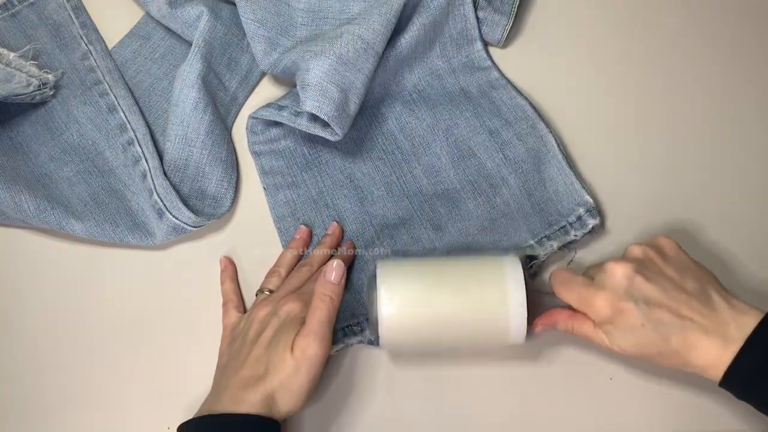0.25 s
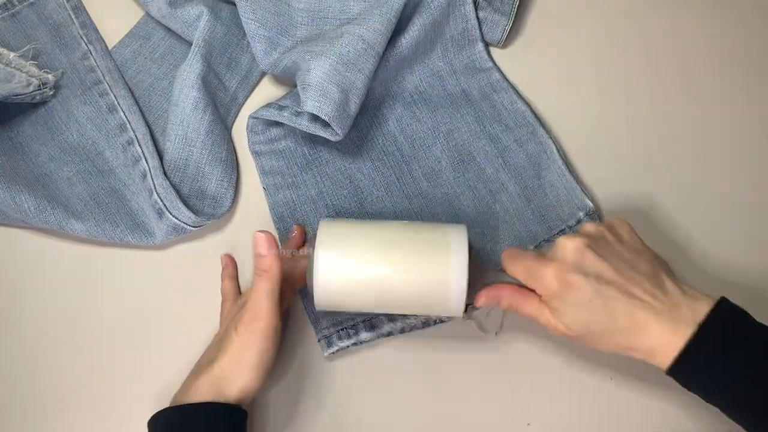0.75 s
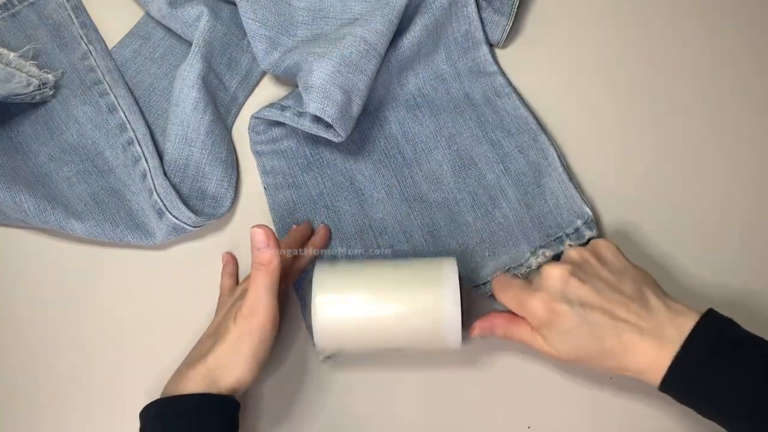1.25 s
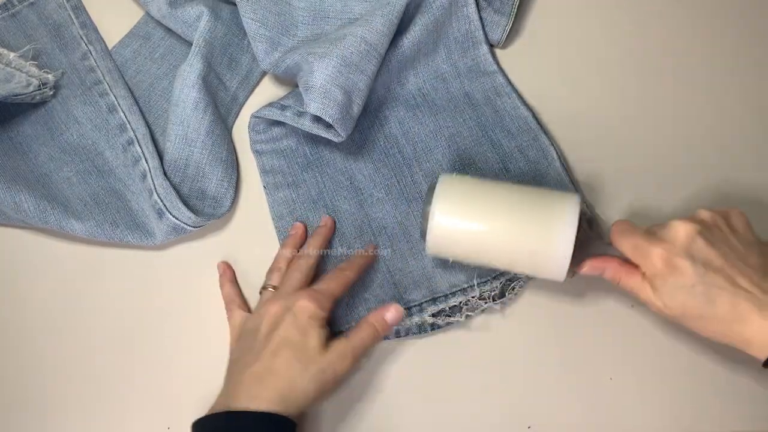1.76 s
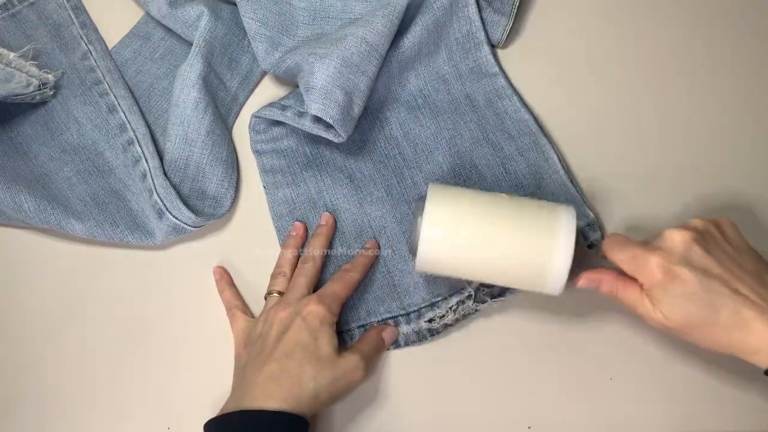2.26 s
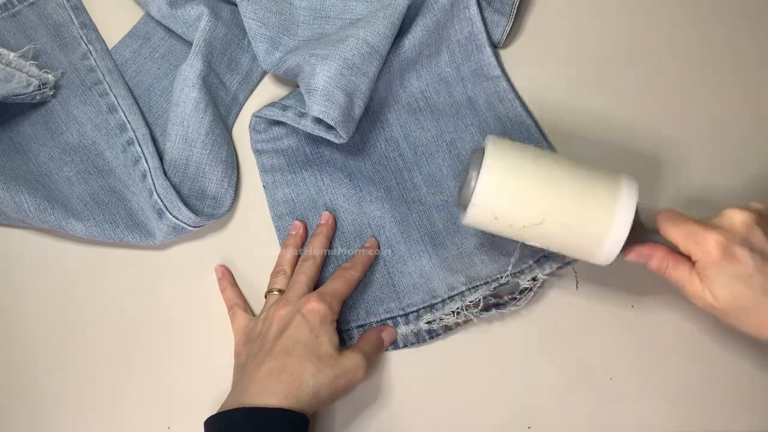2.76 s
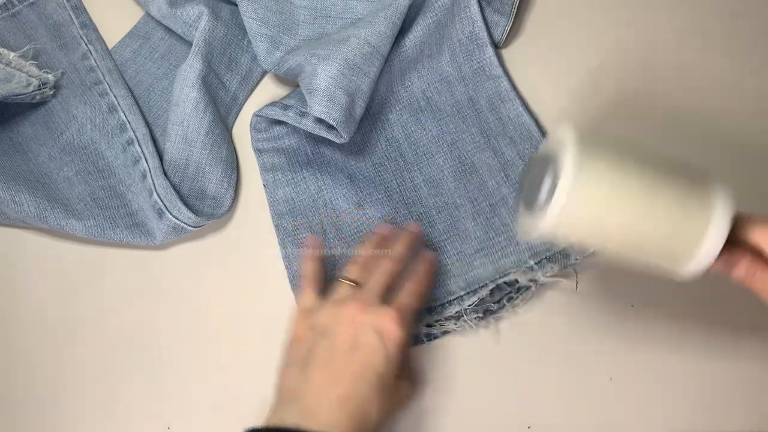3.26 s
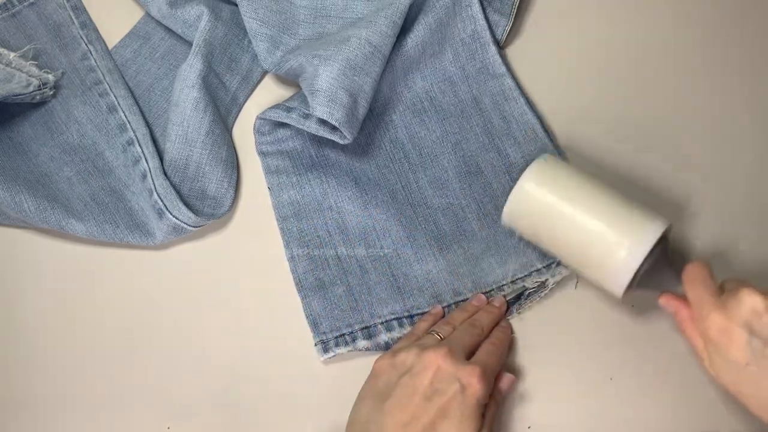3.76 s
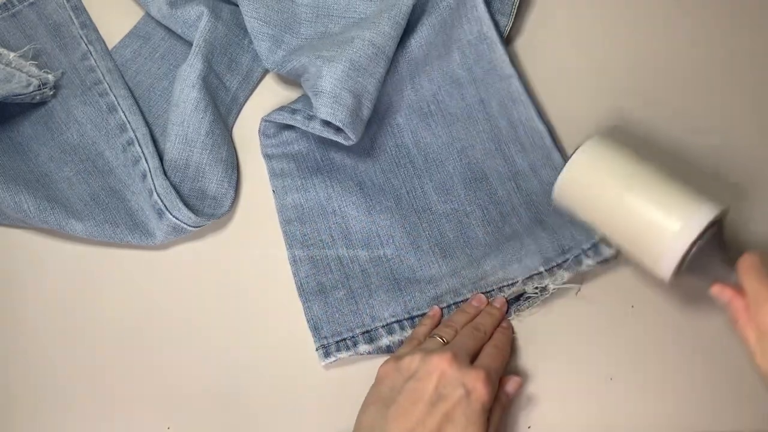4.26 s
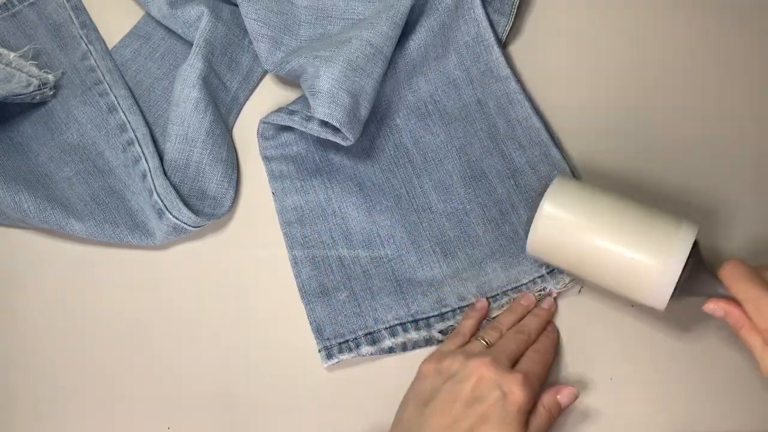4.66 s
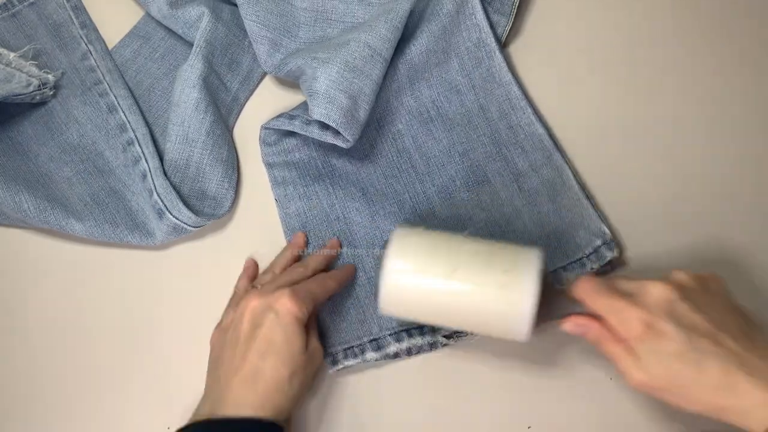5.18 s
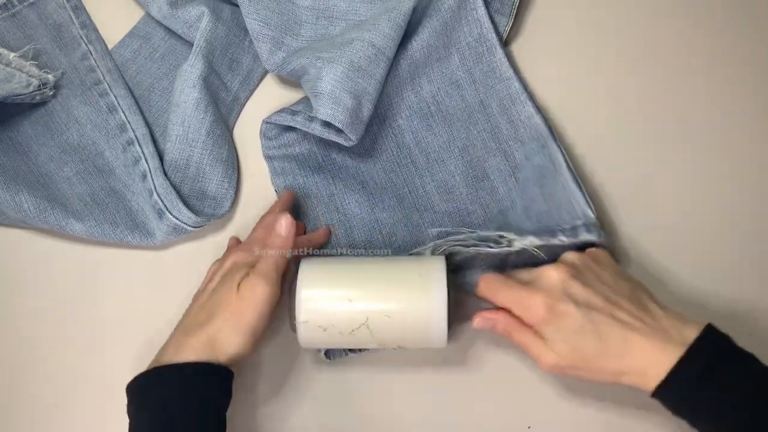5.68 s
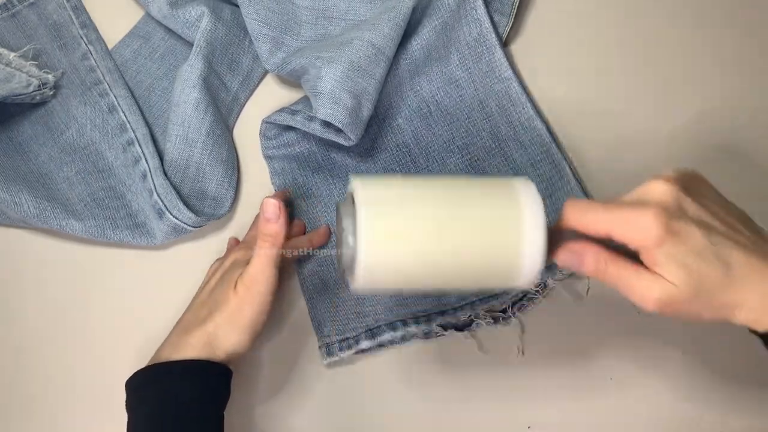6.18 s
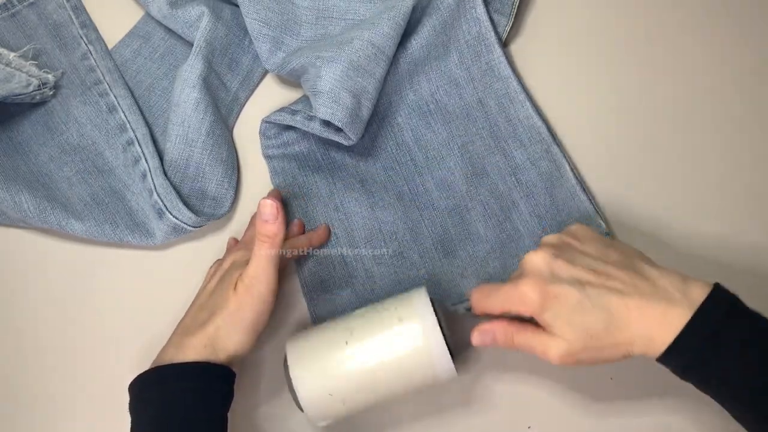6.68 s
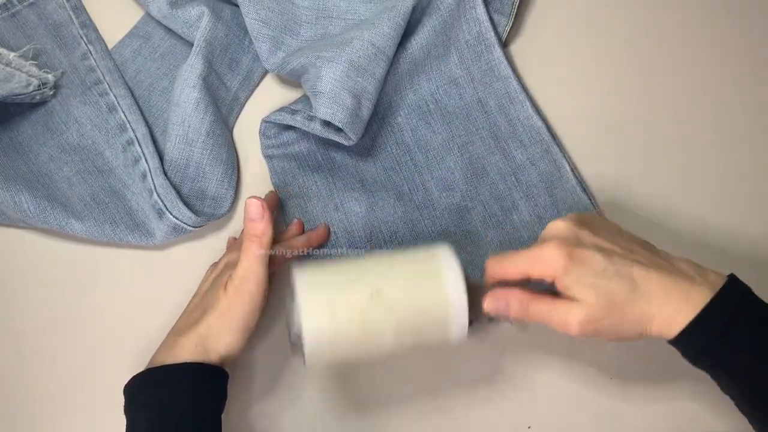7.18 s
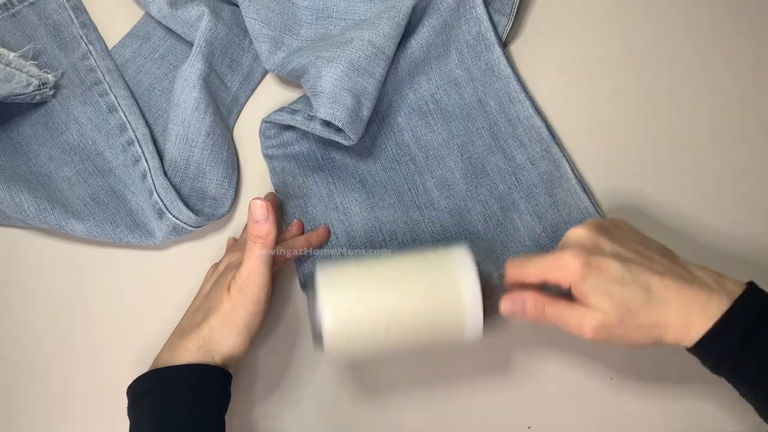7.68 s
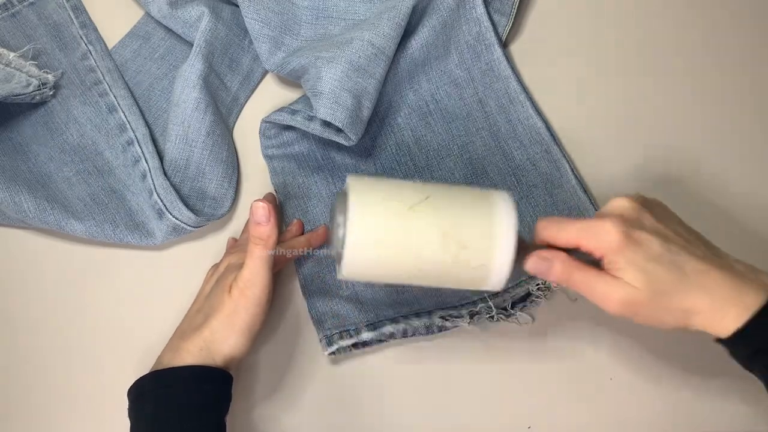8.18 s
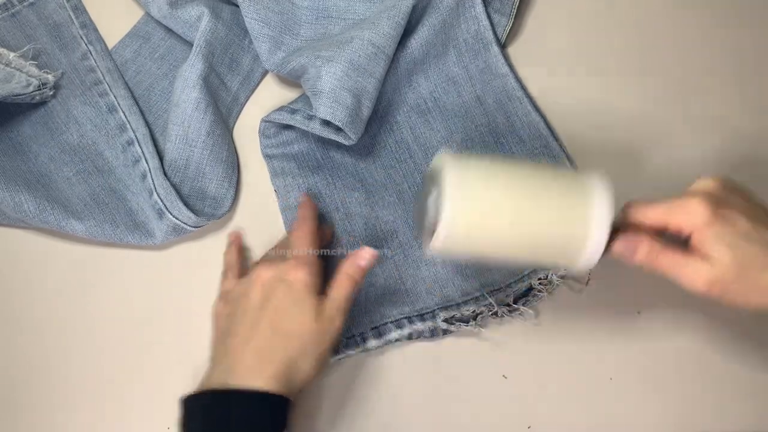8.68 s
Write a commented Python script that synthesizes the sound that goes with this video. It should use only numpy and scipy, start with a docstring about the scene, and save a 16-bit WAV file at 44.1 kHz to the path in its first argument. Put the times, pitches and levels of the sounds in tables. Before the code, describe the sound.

Rapid, uneven strokes of adhesive roller on denim, heard close in stereo with a short room reflection. Each stroke swells in sticky crackle and coarse fabric rasp, then dies away. Bright snaps, dry plastic ticks and gliding scrapes accompany the lifting cloth. Soft table bumps and hollow clacks punctuate the strokes, growing heavier toward the end, when the core squeaks before a strong thud. A faint low drone lies underneath.

```python
"""A sticky lint roller works over a jeans hem on a table, close to a stereo microphone in a quiet room.
From the start, strokes peel tape off the fibres in a fine crackle of noise grains, with a broader cloth rasp.
Soon threads snap in bright noise bursts, clinging denim lifts with gliding rasps and the handle ticks.
From 0.6 s the roller keeps landing: ringing modes for table and core, noise for crushed denim; later,
the core whirs and cloth flops down. The last strokes squeak in narrow resonances before the heaviest landing."""
import sys
import numpy as np
from scipy import signal
from scipy.fft import rfft, irfft, next_fast_len
from scipy.io import wavfile
from scipy.ndimage import uniform_filter1d, map_coordinates

SR = 44100
rng = np.random.default_rng(int(sys.argv[2]) if len(sys.argv) > 2 else 0)


def dump(signal):
    """Clip the signal to [-1, 1] and save it as 16-bit WAV at the path in sys.argv[1]."""
    limited = np.clip(np.atleast_2d(signal).T, -1, 1)
    pcm = np.round(limited * 32767).astype(np.int16)
    wavfile.write(sys.argv[1], SR, pcm)


N = 394249  # length in samples

# spectrum of the tape letting go: hz, density_db (per Hz)
TAPE_SPECTRUM = [(500, -46), (1500, -11), (3000, 2), (5000, 0), (7500, 2.5), (10000, 2.5), (12000, -6),
                 (13800, 1), (16000, -62)]
# spectrum of denim rasping: hz, density_db (per Hz)
CLOTH_SPECTRUM = [(150, -20), (300, -5.5), (450, -2.5), (660, -6), (950, -2), (1300, -2.3), (1750, -3),
                  (2300, -4.3), (3300, -7.2), (5000, -13), (10000, -57)]
# air resonances of the hollow core: centre_hz, width_hz, level_db (relative)
TUBE_MODES = [(1048, 48, -4), (1350, 80, 4), (1545, 50, 0), (1770, 85, -13), (2075, 53, -14),
              (3100, 110, -5), (3500, 120, -6), (4130, 120, -8)]


def amp(db):
    """Decibels to gain."""
    return np.exp(np.asarray(db) * (np.log(10) / 20))


def unit(x):
    """Scaled to rms 1."""
    return x / np.sqrt(np.mean(x ** 2) + 1e-20)


def along(points, hz):
    """(Hz, value) points joined on a log frequency axis."""
    f, v = np.transpose(points)
    return np.interp(np.log(hz + 1), np.log(f + 1), v)


def curves(rows):
    """One value per sample for each column after the time."""
    s, *cols = np.transpose(rows)
    return [np.interp(np.arange(N) / SR, s, c) for c in cols]


def wander(position):
    """A smooth random curve with one knot per unit of position."""
    return map_coordinates(rng.standard_normal(int(position[-1]) + 4), [position])


def wobble(rate):
    """A smooth random curve over the whole scene, rate knots a second."""
    coarse = np.arange(0, N + 32, 32)
    return np.interp(np.arange(N), coarse, wander(coarse * rate / SR))


def filtered(x, response):
    """x times a complex response of frequency."""
    n = x.shape[-1]
    padded = next_fast_len(n + 8192)
    spectrum = rfft(x, padded) * response(np.fft.rfftfreq(padded, 1 / SR))
    return irfft(spectrum, padded)[..., :n]


def coloured(x, spectrum):
    """x shaped by the given spectrum."""
    return filtered(x, lambda hz: amp(along(spectrum, hz)))


def resonate(x, modes):
    """x through a set of resonances; each is applied twice over for steep skirts."""
    def response(hz):
        total = 0
        for centre, width, db in modes:
            damping = 1j * hz * width
            total = total + amp(db) * (damping / (centre * centre - hz * hz + damping)) ** 2
        return total
    return filtered(x, response)


def add(track, s, sound):
    """Mixes a sound into a track at time s."""
    start = max(round(s * SR), 0)
    part = track[..., start:start + sound.shape[-1]]
    part += sound[..., :part.shape[-1]]


def ports(x, lag_ms):
    """The sound reaches the left microphone lag_ms after the right one."""
    def delays(hz):
        turn = np.exp(1j * np.pi * hz * lag_ms / 1000)  # half the lag on each side
        return np.array([turn.conj(), turn])
    return filtered(x, delays)


def spread(pair):
    """Two unrelated signals become left and right, partly alike."""
    # how alike the two microphones hear: hz, likeness (1 = identical)
    likeness = [(60, .99), (300, 0.77), (700, 0.5), (1400, 0.65), (3000, 0.04), (6000, 0.15), (8000, 0.06),
                (11000, 1), (14000, 0.82)]

    def shares(hz):
        alike = np.clip(along(likeness, hz), -1, 1)
        return np.sqrt([1 + alike, 1 - alike])
    mid, side = filtered(pair, shares)
    return unit(np.array([mid + side, mid - side]))


def grains(rate, scatter_db):
    """Two streams of tiny random releases, rate a second, of uneven size."""
    chance = np.clip(rate / SR, 1e-4, 1)
    size = amp(scatter_db * np.clip(rng.standard_normal((2, N)), -2, 2))
    released = rng.random((2, N)) < chance
    return unit(released * size * rng.standard_normal((2, N)) / np.sqrt(chance))


def ring(modes, vary_db):
    """One blow on a set of decaying modes, peak 1, their strengths scattered by vary_db."""
    t = np.arange(SR // 4) / SR
    out = np.zeros(len(t))
    for hz, db, t60, rise in modes:
        shape = amp(-60 * t / t60) * (1 - np.exp(-(t / rise) ** 2))
        level = amp(db + vary_db * rng.normal())
        out += level * shape / shape.max() * np.sin(2 * np.pi * (hz * t + rng.random()))
    return out / np.abs(out).max()


def burst(spectrum, t60):
    """A short dying crack of noise, peak 1."""
    t = np.arange(SR // 8) / SR
    crack = coloured(rng.standard_normal(len(t)), spectrum) * amp(-60 * t / t60)
    return crack / np.abs(crack).max()


def push(hz, length):
    """The table bends and swings back while the arm presses down and damps it."""
    t = np.arange(int(length * SR)) / SR
    return np.sin(np.pi * t / length) ** 2 * np.sin(2 * np.pi * hz * t)


def sweep(start_hz, end_hz, fall_s, rise_s, t60):
    """A blow whose pitch drops quickly and settles; its envelope peaks at 1."""
    t = np.arange(SR // 4) / SR
    varied_fall_s = fall_s * amp(rng.normal())
    hz = end_hz + (start_hz - end_hz) * np.exp(-t / varied_fall_s)
    shape = (1 - np.exp(-(t / rise_s) ** 2)) * amp(-60 * t / t60)
    return shape / shape.max() * np.sin(2 * np.pi * np.cumsum(hz) / SR)


def waver(x, depth_ms, rate):
    """x read at a wandering delay, so its pitch is unsteady."""
    n = np.arange(x.shape[-1])
    return np.interp(n + depth_ms * SR / 1000 * wander(n * rate / SR), n, x)


def patchy(x, depth_db):
    """Shifting folds of cloth colour the sound in passing patches of time and frequency."""
    z = signal.stft(x, nperseg=512)[2]
    field = rng.standard_normal(z.shape[1:])
    field = uniform_filter1d(field, size=4, axis=0)
    field = uniform_filter1d(field, size=9, axis=1)
    return unit(signal.istft(z * amp(depth_db * unit(field)), nperseg=512)[1][:, :N])


def table_echo(x, share):
    """The table top mirrors the sound; the detour changes as the roller moves."""
    delay_ms = np.clip(0.774 + 0.18 * wobble(3), .2, 2)
    n = np.arange(N)
    mirrored = np.array([np.interp(n - delay_ms * SR / 1000, n, side) for side in x])
    return unit(x + share * mirrored)


def room(x):
    """The walls answer each side with a decaying noise tail of its own, 5 ms late."""
    # decay of the room: hz, t60_s
    decay = [(100, 0.34), (1300, 0.28), (4000, 0.22), (14000, 0.097)]
    hz, t, z = signal.stft(rng.standard_normal((2, SR // 2)), SR, nperseg=256)
    fade = amp(-60 * t / along(decay, hz)[:, None])
    tail = signal.istft(z * fade, SR, nperseg=256)[1]
    tail = np.pad(tail, ((0, 0), (int(.005 * SR), 0)))
    return signal.fftconvolve(x, tail / np.linalg.norm(tail[0]), axes=1)[:, :N]


def background():
    """Still room air as shaped noise, with a low drone of sines wavering in phase."""
    # room drone: pitch_hz, level_db
    hum = [(70, -64.5), (118.4, -68.5), (188.4, -99)]
    # spectrum of the room air: hz, density_db (per Hz)
    air_spectrum = [(20, -2.5), (70, 4), (130, -10.5), (210, -13.5), (300, -22), (650, -34), (1300, -36.5),
                    (4000, -36), (16000, -43)]
    t = np.arange(N) / SR
    drone = np.zeros(N)
    for hz, db in hum:
        drone += amp(db) * unit(np.sin(2 * np.pi * hz * t + 0.33 * wobble(4.3)))
    air = spread(coloured(rng.standard_normal((2, N)), air_spectrum))
    return drone + amp(-65.5) * air


def rumble(cloth_db):
    """The table murmurs under the hands' weight and swells a little with each stroke."""
    # weight of hands and roller on the table: time_s, level_db (before gain_db)
    weight = [(0.0, -64), (0.87, -51.5), (1.54, -60), (2.46, -54), (2.74, -60.5), (3.14, -54),
              (3.34, -58.5), (4.33, -55), (5.1, -63), (5.25, -56.5), (5.8, -52.5), (6.25, -60), (7.07, -53),
              (7.22, -58), (7.94, -63.5), (8.07, -53.5), (8.79, -59.5), (8.94, -57)]
    # spectrum of the table's murmur: hz, density_db (per Hz)
    rumble_spectrum = [(20, -12.5), (35, -18.5), (48, 1), (62, 1), (88, -5), (120, -10.5), (155, -14.5),
                       (185, -7.5), (210, -26), (238, -14), (290, -28.5), (600, -38), (1500, -66)]
    gain_db, growth, inertia_s = 1.0, 0.12, 0.16  # growth: exponent of the swell with rolling
    weight_db, = curves(weight)
    motion = np.abs(uniform_filter1d(amp(cloth_db), int(inertia_s * SR))) + 1e-9
    murmur = spread(coloured(rng.standard_normal((2, N)), rumble_spectrum))
    return amp(weight_db + gain_db + 2.9 * wobble(12)) * unit(motion ** growth) * murmur


def core_rings():
    """The core's thin wall is jolted and rings on in a close pair of wavering modes."""
    # jolts to the core: start_s, level_db, pitch_hz
    jolts = [(.624, -60, 1402), (.741, -62, 1550), (2.331, -51, 1545), (4.08, -58, 1340),
             (6.883, -46, 1325), (7.388, -53, 1227), (7.728, -67, 1560), (8.03, -58.5, 1555)]
    # pair of wall modes: frequency_ratio, level_db (relative), t60_s, rise_s
    wall_modes = [(1, 0, .2, .002), (1.03, -1, .06, .0017)]
    out = np.zeros(N)
    for s, db, hz in jolts:
        modes = [(ratio * hz, *rest) for ratio, *rest in wall_modes]
        add(out, s, amp(db) * waver(ring(modes, vary_db=1), depth_ms=.075, rate=230))
    return out


def landings():
    """The tape grazes, slaps and crushes the denim, the hollow core clacks, the table knocks and bends."""
    # roller set down or bumping off the hem: start_s, then base levels of table thump_db, knock_db,
    # core clack_db and crushed denim crush_db (each layer adds its offset), clack_top_hz
    hits = [(.622, -53, -45, -46, -51, 597), (.835, -37, -49, -55, -57, 1500),
            (1.053, -43, -54, -53.5, -57, 1530), (1.861, -39, -64, -67, -75, 1510),
            (2.323, -27, -27.5, -47.5, -41.5, 1100), (2.93, -36.5, -46, -70, -64, 1500),
            (3.571, -30.5, -34, -46.5, -50, 1201), (3.977, -50, -39, -56, -49, 1210),
            (4.075, -29.5, -35.5, -66, -62, 920), (4.729, -33, -48, -66, -60, 1203),
            (5.041, -48, -47, -62, -60, 1200), (5.264, -28.5, -29.5, -42, -42.5, 597),
            (5.745, -33, -40.5, -64, -52, 890), (6.445, -32.5, -36, -36.5, -45, 780),
            (6.883, -27.5, -25.5, -43.5, -44, 900), (7.385, -34.5, -38.5, -36.5, -51, 1350),
            (7.923, -27.5, -27, -52, -40.5, 1190), (8.362, -26.5, -33, -33, -37.5, 899.8),
            (8.924, -21.5, -24.3, -24.5, -31.5, 1900)]
    # slow table modes: pitch_hz, level_db (relative), t60_s, rise_s
    table_modes = [(49.3, -6.5, 0.38, 0.041), (67.1, -8, 0.68, 0.015)]
    # knock modes of the table top: pitch_hz, level_db (relative), t60_s, rise_s
    knock_modes = [(96.3, 3, 0.17, 0.02), (122, 6, 0.15, 0.011), (191.5, -9.5, 0.15, 0.0035),
                   (235.7, -5.3, 0.2, 0.004), (312, -15.5, 0.11, 0.01), (404, -17, 0.072, 0.0017)]
    # clack modes of the plastic core: pitch_hz, level_db (relative), t60_s, rise_s
    core_modes = [(401.5, -3.5, 0.098, 0.00023), (625, -6, 0.079, 0.00046), (850, 1, 0.0082, 0.002),
                  (945, -5, 0.022, 0.0016), (993, 2.5, 0.012, 0.00094), (1312, -2.5, 0.064, 0.00031),
                  (1490, -11, 0.092, 0.0002), (1950, -6, 0.034, 0.00025)]
    # spectrum of denim crushed under the roller: hz, density_db (per Hz)
    crush_spectrum = [(90, -8.5), (200, 4.5), (330, 0), (560, -11), (900, -19), (2000, -18.5), (6000, -30),
                      (14000, -72)]
    # spectrum of tape meeting cloth: hz, density_db (per Hz)
    slap_spectrum = [(150, -44), (400, 17), (1100, -5), (1700, -16), (3000, -2.5), (8000, -22)]
    graze_s = .03
    out = core_rings()
    for s, thump_db, knock_db, clack_db, crush_db, top_hz in hits:
        # the roller grazes the raised cloth just before it lands
        rise = np.linspace(0, 1, int(graze_s * SR))
        graze = unit(coloured(rng.standard_normal(len(rise)), crush_spectrum))
        add(out, s - graze_s, amp(knock_db - 22.5) * rise ** 2 * graze)

        add(out, s - .004, amp(thump_db) * push(hz=59 * amp(0.56 * rng.normal()), length=0.08))
        add(out, s + .02, amp(thump_db - 13) * ring(table_modes, vary_db=2))

        # bending waves bring the higher notes of a knock first
        bend = sweep(start_hz=430, end_hz=116, fall_s=.006, rise_s=.011, t60=.11)
        add(out, s, amp(knock_db - 7.5) * bend)
        add(out, s, amp(knock_db - .6) * ring(knock_modes, vary_db=0.0))
        add(out, s + 0.00304, amp(crush_db) * burst(crush_spectrum, t60=0.23))

        # the glue takes hold softly
        press = np.hanning(int(.06 * SR))
        glue = unit(coloured(rng.standard_normal(len(press)), TAPE_SPECTRUM))
        add(out, s - .018, amp(knock_db - 41) * press * glue)

        # the clack is dulled above its top frequency
        cushion = signal.butter(3, np.clip(top_hz, 200, 8000), fs=SR)
        clack = signal.lfilter(*cushion, ring(core_modes, vary_db=2))
        add(out, s + 0.00197, amp(clack_db + 1.5) * clack)
        add(out, s + .001, amp(clack_db - 8) * burst(slap_spectrum, t60=.045))
    return ports(out, lag_ms=-0.11) * amp([[-.3], [.3]])


def flops():
    """Let go by the glue, a fold of the hem whips flat and pats the table."""
    # the hem drops back on the table: start_s, base_level_db (each layer adds its offset)
    drops = [(1.515, -52), (2.559, -43), (2.582, -48), (3.138, -48), (4.285, -56), (4.325, -53),
             (5.929, -46), (6.031, -52), (6.069, -54), (6.68, -57), (7.089, -41.5), (7.596, -41),
             (8.45, -52)]
    # what a drop rings with: pitch_hz, level_db (relative), t60_s, rise_s
    flop_modes = [(239.2, 0, .22, 0.0047), (400.4, -4.5, 0.044, .002), (620, -10, 0.044, .001)]
    # spectrum of the cloth's soft crack: hz, density_db (per Hz)
    pat_spectrum = [(100, -14), (260, 0), (600, -3), (1300, -8), (2500, -22), (6000, -50)]
    out = np.zeros(N)
    for s, db in drops:
        # the slap drops in pitch as the fold flattens
        fold = sweep(start_hz=900, end_hz=240, fall_s=.0028, rise_s=.003, t60=.07)
        add(out, s - .002, amp(db - 7) * fold)
        add(out, s - .001, amp(db - 2) * burst(pat_spectrum, t60=.06))
        add(out, s, amp(db - 4) * ring(flop_modes, vary_db=2))
    return ports(out, lag_ms=-0.12)


def handle_ticks():
    """The plastic handle ticks in its core: a dry noise click over a weaker rattle that lasts longer."""
    # ticks: start_s, level_db, brightest_hz, rattle_db (against the click)
    tick_times = [(0.6056, -38, 2520, -15), (.6115, -51, 1000, -8), (.617, -51, 2500, -9),
                  (2.696, -51, 1500, -9), (2.851, -55, 1450, -4), (3.467, -52, 1950, -12),
                  (3.978, -47, 1900, -12), (5.043, -51.5, 2000, -14), (5.716, -59, 700, -8),
                  (5.741, -57, 1700, -12), (6.029, -52, 2100, -16), (6.067, -51, 1600, -16),
                  (6.843, -52, 1300, -10), (6.871, -49, 1700, -14), (6.877, -44.5, 1400, -14),
                  (7.063, -40, 1700, -14), (7.212, -57, 1000, -12), (7.365, -59, 1540, -12),
                  (7.927, -39.5, 2270, -16), (7.971, -47, 1150, -14), (8.345, -53, 1000, -9),
                  (8.798, -57, 1100, -6)]
    # tick spectrum: ratio to brightest_hz, density_db (per Hz)
    tick_shape = [(.1, -7), (.45, -6), (1, -3), (1.3, -6), (1.8, -21), (3, -31), (6, -52)]
    click_t60_s, rattle_t60_s = .024, .13
    out = np.zeros(N)
    for s, db, hz, rattle_db in tick_times:
        colour = [(ratio * hz, level) for ratio, level in tick_shape]
        rattle = amp(rattle_db) * burst(colour, rattle_t60_s)
        add(out, s, amp(db) * (burst(colour, click_t60_s) + rattle))
    return ports(out, lag_ms=-0.069)


def thread_snaps():
    """Stuck threads and tape edges snap free: a sharp break over a short crackle of bright noise."""
    # snaps, loud and faint: start_s, level_db, crackle_t60_s
    snap_times = [(0.2638, -38, 0.018), (0.739, -46, 0.033), (.7637, -44.5, 0.13), (0.854, -41, .06),
                  (0.934, -34.5, .03), (1.024, -43.5, 0.027), (1.156, -37.5, .02), (1.358, -38, 0.026),
                  (2.406, -56, 0.025), (2.6961, -37.5, 0.039), (2.9503, -47, 0.034), (3.25, -47, 0.05),
                  (3.8616, -43, 0.22), (5.271, -37, 0.047), (5.3406, -31.5, 0.018), (6.125, -65, .05),
                  (6.4473, -36, 0.019), (6.621, -47, .015), (6.7556, -32, 0.075), (6.974, -40.5, 0.028),
                  (7.0637, -45, 0.014), (7.3867, -44, .019), (7.564, -41, 0.011), (8.1675, -52, 0.03),
                  (8.363, -47, .02), (8.381, -45, .03), (8.402, -42, 0.03)]
    # snap spectrum: hz, density_db (per Hz)
    snap_spectrum = [(300, -40), (1500, -15), (3200, -3), (7500, 1), (11000, 1.5), (14000, 1.5),
                     (16000, -19)]
    out = np.zeros(N)
    for s, db, t60 in snap_times:
        sharp_break = burst(snap_spectrum, t60=0.0025)
        add(out, s, amp(db) * (sharp_break + amp(-1.5) * burst(snap_spectrum, t60)))
    return ports(out, lag_ms=0.29)


def clicks():
    """Thread snaps and handle ticks, with the room's answer to them."""
    direct = thread_snaps() + handle_ticks()
    return direct + room(amp(-5.0) * direct)


def whirs():
    """The freely spinning hollow core hums in its air modes, swelling and running down."""
    # whirs: start_s, length_s, level_db (before the swell)
    spins = [(1.499, 0.2, -76), (3.06, .13, -63.5), (3.24, .24, -76), (3.646, 0.11, -61), (4.11, .11, -58),
             (4.259, .1, -67), (4.38, .14, -74), (4.799, 0.13, -69), (8.54, .22, -75)]
    out = np.zeros((2, N))
    for s, length, db in spins:
        swell = np.hanning(int(length * SR))
        hum = spread(resonate(rng.standard_normal((2, len(swell))), TUBE_MODES))
        add(out, s, amp(db) * swell * hum)
    return out


def spindle():
    """The core rubs on its spindle: a thin squeak of resonant noise that catches and wavers as it turns."""
    # squeak in the last strokes: time_s, level_db, overtone_db (against the main note)
    squeak_levels = [(8.335, -100, -20), (8.348, -72, -20), (8.40, -62, -6), (8.47, -69, -6),
                     (8.57, -69, -7), (8.615, -64, -10), (8.645, -70, -11), (8.67, -66, -13),
                     (8.698, -71, -10), (8.716, -63.5, -14), (8.752, -69, -3), (8.788, -61, -11),
                     (8.83, -70, -4), (8.85, -68, -7), (8.888, -73, -7), (8.91, -64.5, -18)]
    # main note and overtone: centre_hz, width_hz, level_db
    spindle_modes = [(2818, 200, 0), (7680, 620, 0)]
    level_db, overtone_db = curves(squeak_levels)
    main, over = [unit(resonate(rng.standard_normal((2, N)), [mode])) for mode in spindle_modes]
    notes = main + amp(overtone_db + 2 * wobble(21)) * over
    squeak = np.array([waver(side, depth_ms=.17, rate=45) for side in notes])
    return squeak * amp(level_db + 2 * wobble(70))


def lifting():
    """The flap of denim that clings to the roller changes length, so its broad rasp glides."""
    # denim comes loose: start_s, length_s, start_hz, end_hz, level_db (before the swell),
    # memory_cycles (how long the flap keeps its swing)
    lifts = [(0.385, 0.06, 1900, 452, -54, 1.08), (0.451, 0.083, 905, 300, -60.5, 1.5),
             (0.732, 0.059, 392, 215, -60.5, 0.93), (0.835, 0.088, 485, 219, -62, 1.01),
             (1.019, 0.065, 979, 1200, -59, 5.1), (1.131, .05, 1150, 1340, -61.5, 4.7),
             (1.227, 0.065, 1028, 1343, -59.5, 5.06), (1.427, 0.048, 1350, 1050, -57, 3),
             (1.505, 0.066, 522, 260, -60.5, 1), (2.075, 0.05, 1587, 349, -53.5, 1),
             (2.51, 0.085, 1150, 480, -51, 1.0), (2.6, 0.051, 905, 853, -60, 4.7),
             (3.075, 0.05, 1198, 850, -57, 1.5), (3.145, 0.053, 1000, 780, -54.5, 2.2),
             (3.675, 0.056, 1790, 1006, -55.5, 1.94), (4.121, .08, 1052, 945, -66, 4),
             (4.264, 0.08, 1398, 500, -64, 1.5), (4.941, 0.038, 1506, 1104, -64, 2.16),
             (5.42, 0.06, 1400, 950, -56, 1.1), (5.893, 0.045, 1308, 950, -65, 0.98),
             (6.644, 0.066, 1810, 1405, -56, 2), (7.0, .05, 900, 750, -61, 1),
             (7.068, 0.03, 1500, 800, -54, 1.01), (7.565, 0.042, 1303, 1000, -58.5, 1.2)]
    out = np.zeros((2, N))
    for s, length, start_hz, end_hz, db, memory in lifts:
        u = np.linspace(0, 1, int(length * SR))
        hz = end_hz * (start_hz / end_hz) ** ((1 - u) ** 1.3)
        cycles = np.cumsum(hz) / SR
        # limp cloth soon forgets its swing
        flap = wander(cycles / memory) * np.cos(2 * np.pi * cycles)
        flap += wander(cycles / memory) * np.sin(2 * np.pi * cycles)
        scrape = unit(coloured(rng.standard_normal((2, len(u))), CLOTH_SPECTRUM))
        jerks = unit(amp(2.7 * wander(u * length * 220)))  # it comes away thread by thread
        swell = np.abs(np.sin(np.pi * u)) ** 0.79
        add(out, s, amp(db) * (unit(flap) + amp(-8) * scrape) * jerks * swell)
    return ports(out, lag_ms=-0.074)


def rolling():
    """Tape and cloth levels in dB: each stroke takes hold, swells with speed, sags as it slows and dies away."""
    # pushes and pulls of the roller: start_s, fastest_s, stop_s, then base levels tape_db, cloth_db
    strokes = [(-.05, 0, 0.0092, -57.5, -57.5), (0.05, 0.098, 0.12, -59, -61.5),
               (0.143, 0.17, 0.2, -58.5, -57), (0.236, 0.272, 0.3, -56, -56.5),
               (0.31, 0.401, 0.44, -51, -52.5), (0.749, 0.772, 0.8, -57, -70.5),
               (0.818, 0.868, 0.94, -56.5, -60.5), (1.003, 1.05, 1.07, -58.5, -58),
               (1.101, 1.141, 1.145, -53, -53.5), (1.229, 1.261, 1.294, -58.5, -58.5),
               (1.308, 1.347, 1.39, -55.5, -55), (1.395, 1.448, 1.467, -52.5, -56),
               (1.608, 1.83, 1.81, -70.5, -74.5), (1.836, 1.92, 1.985, -59, -57),
               (2.007, 2.095, 2.11, -54, -53.5), (2.378, 2.533, 2.594, -53, -53.5),
               (2.85, 2.92, 2.9, -75, -75), (2.92, 3.11, 3.16, -56.5, -55), (3.287, 3.355, 3.365, -64, -78),
               (3.536, 3.577, 3.6, -67.5, -66), (3.61, 3.698, 3.705, -54, -55.5),
               (3.733, 3.796, 3.87, -58.5, -59), (4.062, 4.158, 4.19, -58, -56),
               (4.207, 4.278, 4.29, -54, -57.5), (4.36, 4.41, 4.46, -65.5, -77),
               (4.544, 4.572, 4.62, -67.5, -70), (4.66, 4.735, 4.78, -59.5, -63.5),
               (4.796, 4.836, 4.93, -64, -62.5), (5.085, 5.165, 5.25, -61, -67),
               (5.25, 5.468, 5.475, -54.5, -58.5), (5.555, 5.618, 5.72, -70, -71),
               (5.775, 5.83, 5.97, -72.5, -71), (5.823, 5.935, 5.933, -53, -57.5),
               (6.451, 6.646, 6.67, -56.5, -57), (6.702, 6.76, 6.8, -57.5, -63.5),
               (6.865, 6.885, 6.93, -68, -72), (6.955, 7.087, 7.075, -53, -53),
               (7.378, 7.403, 7.47, -66.5, -63.5), (7.49, 7.581, 7.64, -53, -56),
               (7.764, 7.897, 7.92, -64, -66), (7.904, 7.945, 8.01, -55, -60),
               (8.355, 8.531, 8.55, -53, -57), (8.6, 8.627, 8.66, -66, -72), (8.686, 8.76, 8.83, -73, -77)]
    attack_s, swell_db, sag_db = .04, 9.5, 2.5  # tape takes hold; gain up to full speed; loss while slowing
    tape_release_s, cloth_release_s = 0.25, 0.29  # time to fall 60 dB after a stop
    t = np.arange(0, N + 64, 64) / SR
    tape, cloth = np.full((2, len(t)), 1e-10)  # powers
    for start, fastest, stop, tape_db, cloth_db in strokes:
        grip = .5 + .5 * np.tanh(2 * (t - start) / attack_s - .5)
        speed = np.clip((t - start) / max(fastest - start, 1e-3), 0, 1)
        slowing = np.clip((t - fastest) / max(stop - fastest, 1e-3), 0, 1)
        shape_db = swell_db * (speed ** 1.7 - 1) - sag_db * slowing
        after = np.maximum(t - stop, 0)
        tape_fall_db = 60 * (after / tape_release_s) ** 1.307
        cloth_fall_db = 60 * (after / cloth_release_s) ** 1.12
        tape += (grip * amp(tape_db + shape_db - tape_fall_db)) ** 2
        cloth += (grip * amp(cloth_db + shape_db - cloth_fall_db)) ** 2
    return curves(np.transpose([t, 10 * np.log10(tape), 10 * np.log10(cloth)]))


def cloth_rasp(cloth_db, weave_db, rate):
    """Denim fibres rasp, coarser ones break one by one, and the hollow core sings with them."""
    # spectrum of coarser fibres breaking: hz, density_db (per Hz)
    crackle_spectrum = [(500, -21), (1100, -4.5), (2800, 1), (5000, -8), (10000, -7.5), (16000, -29)]
    tube_db, tube_swing_db = -15.5, 4.5  # core against the cloth level; how far each mode comes and goes
    crackle_per_s, crackle_db = 300, -5.5  # crackle_db is against the cloth level
    fibres = grains(.5 * rate, scatter_db=1.5)
    rasp = unit(coloured(fibres, CLOTH_SPECTRUM)) * amp(cloth_db + weave_db + 0.6 * wobble(35))
    # each air mode comes and goes as the core turns
    singing = np.zeros((2, N))
    for mode in TUBE_MODES:
        singing += resonate(fibres, [mode]) * amp(tube_swing_db * np.tanh(wobble(11)))
    singing = unit(singing) * amp(cloth_db + tube_db)
    breaks = unit(coloured(grains(crackle_per_s, scatter_db=1), crackle_spectrum))
    mix = rasp + singing + breaks * amp(cloth_db + crackle_db)
    # the echo returns rms 1, so the mix's own level is put back
    cloth = np.std(mix) * table_echo(spread(patchy(mix, depth_db=2.1)), share=0.45)
    return ports(cloth, lag_ms=-0.04) * amp([[1.3], [-1.3]])


def tape_crackle(tape_db, weave_db, rate):
    """Fibres let go of the glue as a dense stream of bright grains."""
    releases = coloured(grains(rate, scatter_db=-1.0), TAPE_SPECTRUM)
    tape = spread(patchy(releases, depth_db=3.0)) * amp(tape_db + weave_db)
    return ports(tape, lag_ms=0.2917) * amp([[-.45], [.45]])


def peeling(tape_db, cloth_db):
    """Faster rolling peels louder and denser; tape and cloth share the uneven grip of the weave."""
    grains_per_s, reference_db, growth = 16000, -54, .6  # release rate at the reference level; its growth
    rate = grains_per_s * amp(growth * (tape_db - reference_db))
    weave_db = 0.48 * wobble(70)
    return tape_crackle(tape_db, weave_db, rate) + cloth_rasp(cloth_db, weave_db, rate)


def scene():
    """Roller, cloth and table in the room."""
    tape_db, cloth_db = rolling()
    contacts = landings() + lifting() + flops()
    peel = peeling(tape_db, cloth_db) + spindle() + whirs()
    walls = room(amp(-7.5) * contacts + amp(-8.0) * peel)
    walls = filtered(walls, lambda hz: hz / np.hypot(hz, 280))  # bass reaches the microphone mostly direct
    return contacts + peel + walls + clicks() + rumble(cloth_db) + background()


def record(dry):
    """The recorder keeps nothing above its band limit of 16200 Hz."""
    return filtered(dry, lambda hz: hz < 16200)


dry = scene()
out = record(dry)
dump(out)
```